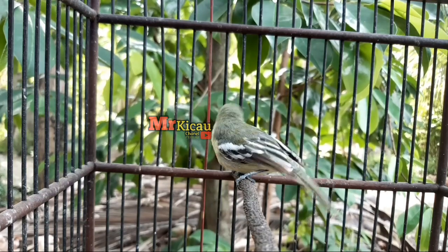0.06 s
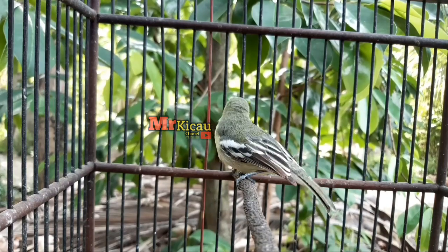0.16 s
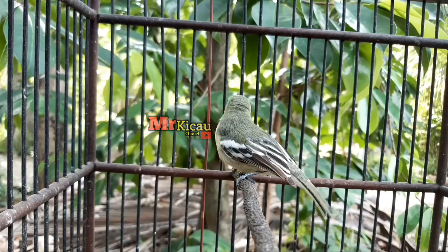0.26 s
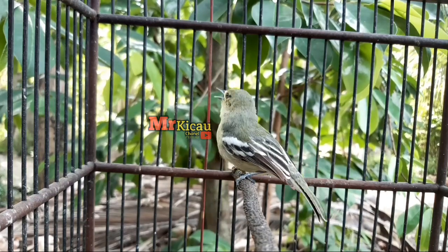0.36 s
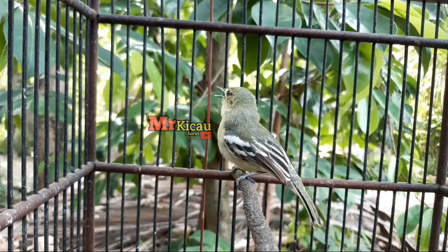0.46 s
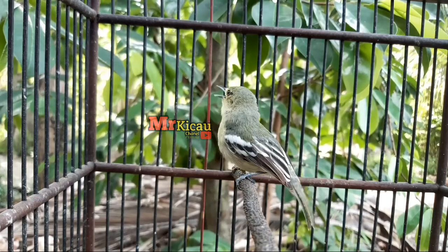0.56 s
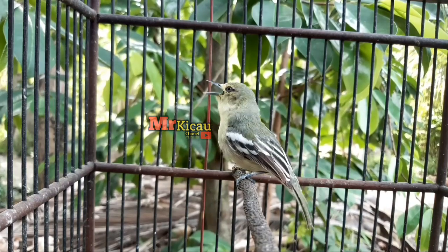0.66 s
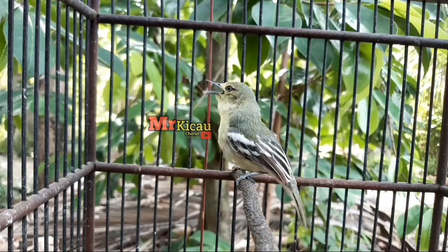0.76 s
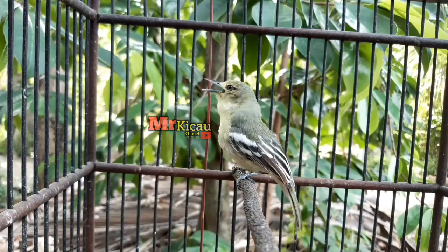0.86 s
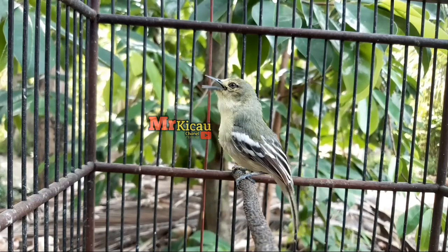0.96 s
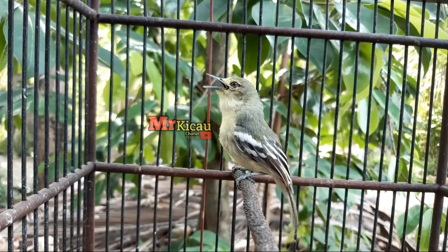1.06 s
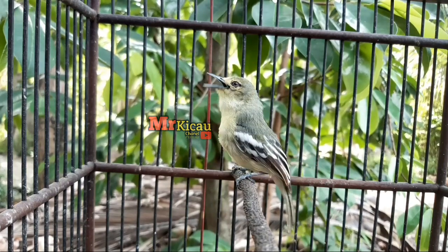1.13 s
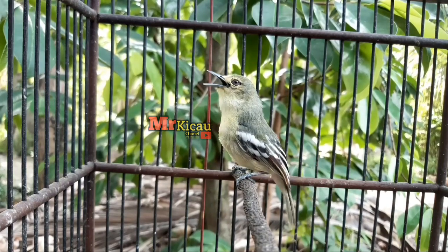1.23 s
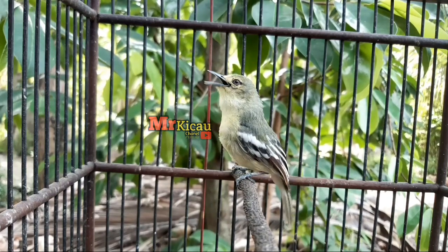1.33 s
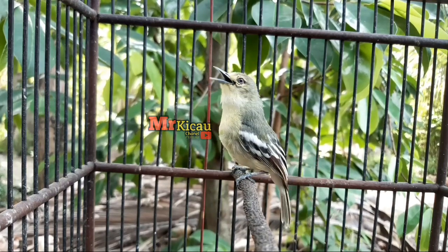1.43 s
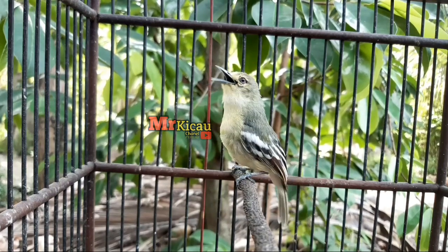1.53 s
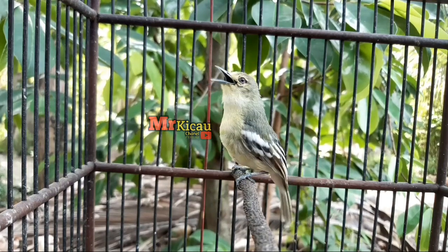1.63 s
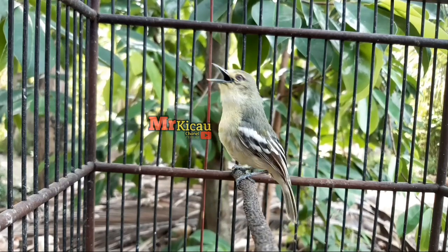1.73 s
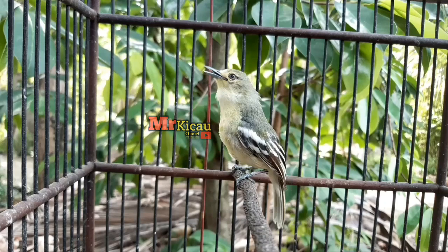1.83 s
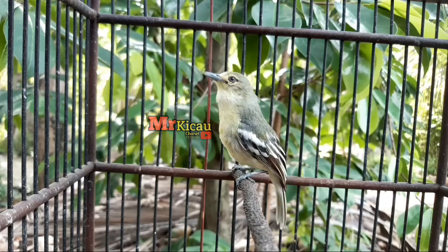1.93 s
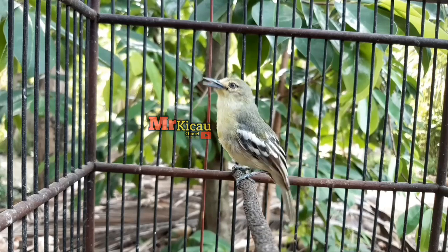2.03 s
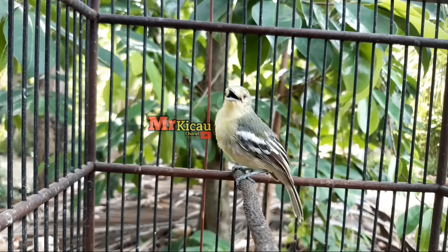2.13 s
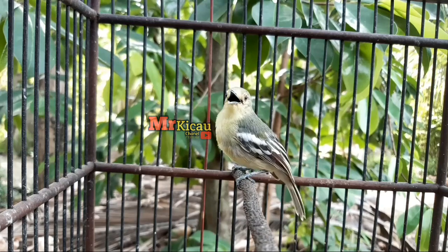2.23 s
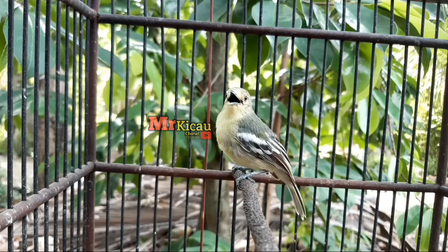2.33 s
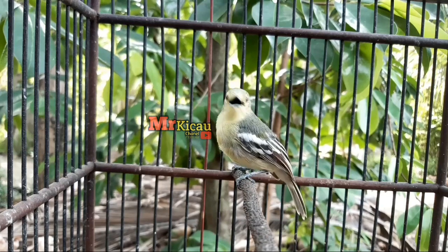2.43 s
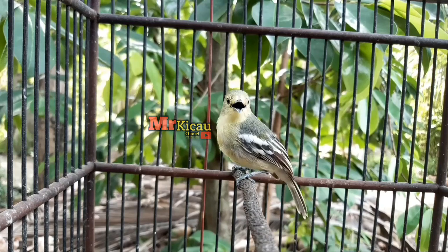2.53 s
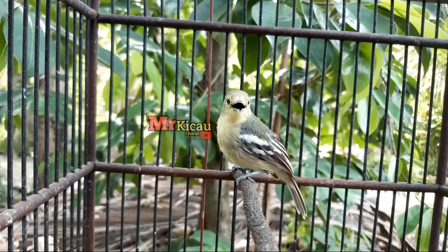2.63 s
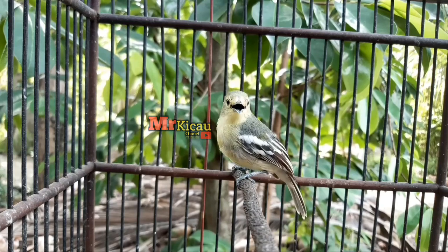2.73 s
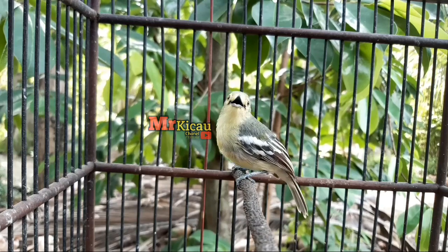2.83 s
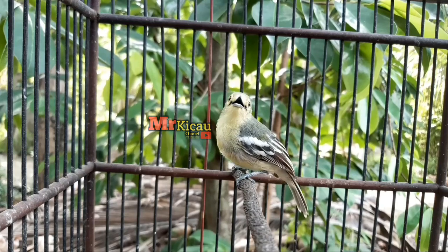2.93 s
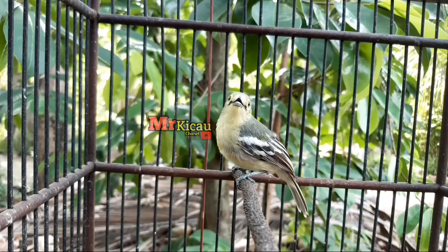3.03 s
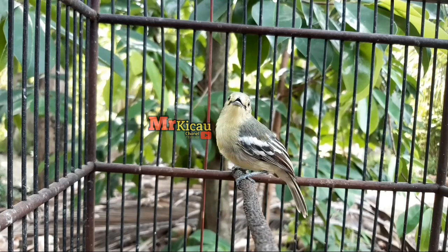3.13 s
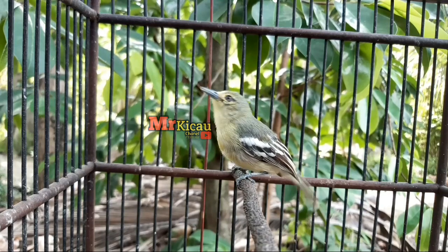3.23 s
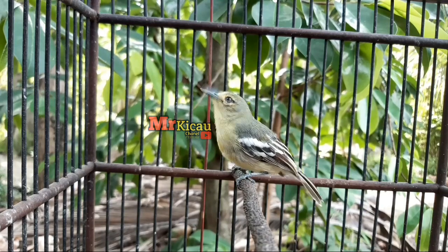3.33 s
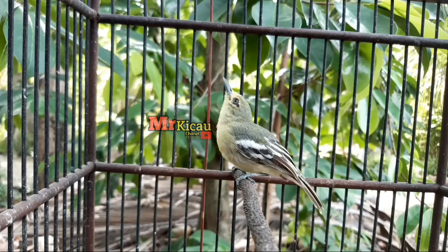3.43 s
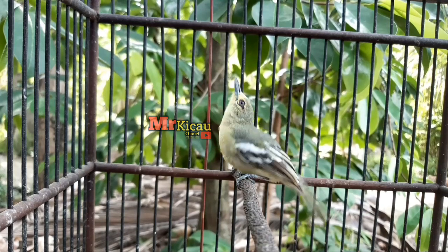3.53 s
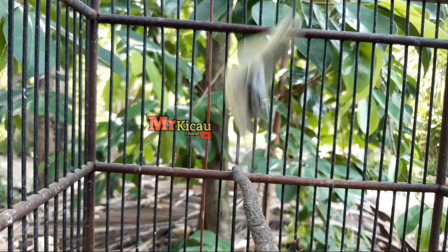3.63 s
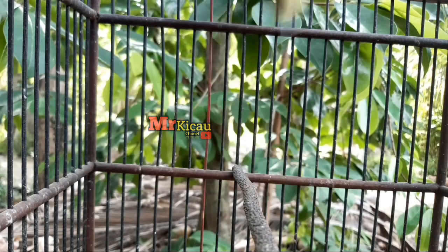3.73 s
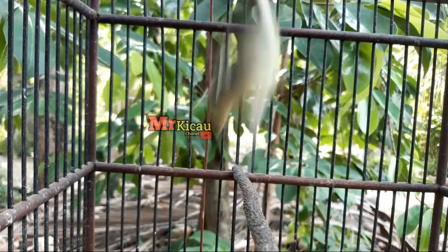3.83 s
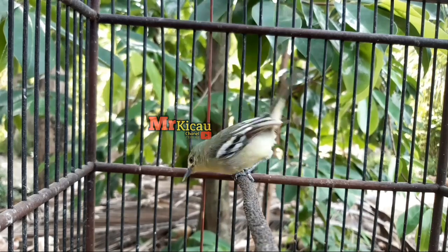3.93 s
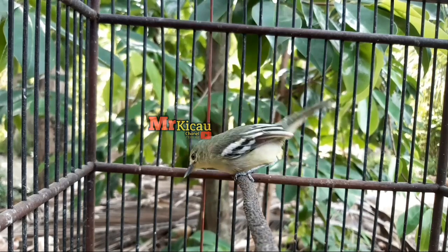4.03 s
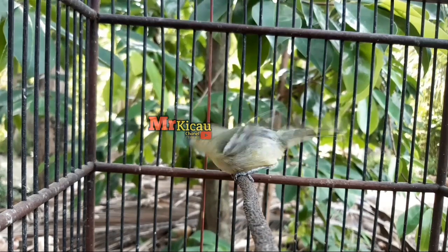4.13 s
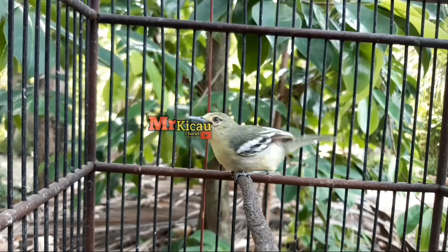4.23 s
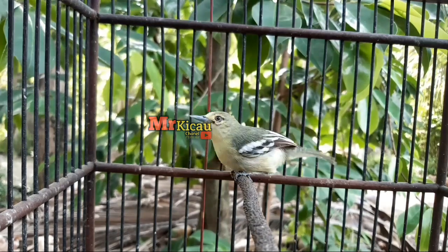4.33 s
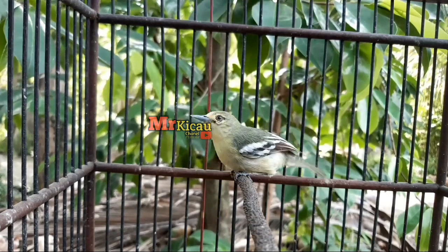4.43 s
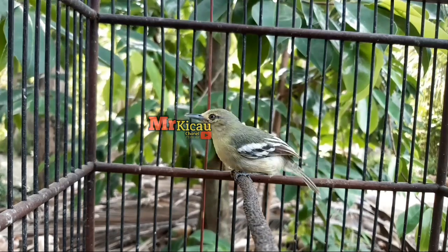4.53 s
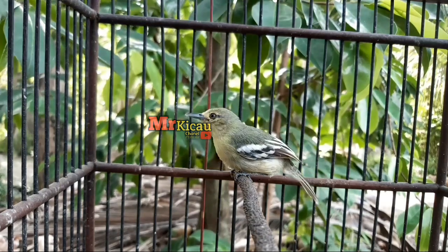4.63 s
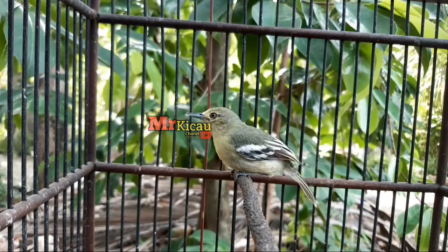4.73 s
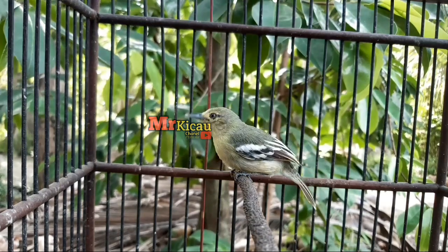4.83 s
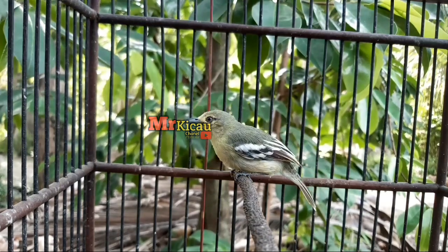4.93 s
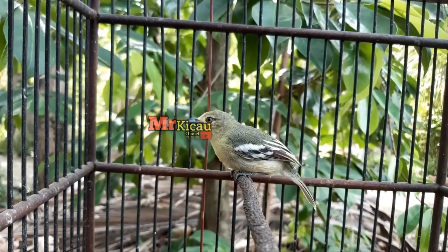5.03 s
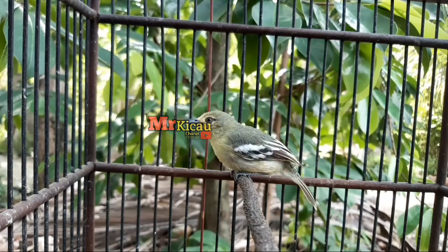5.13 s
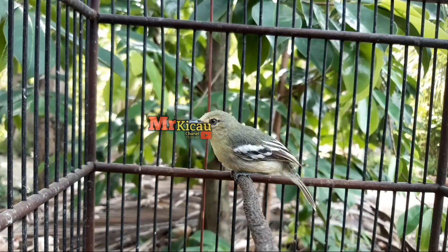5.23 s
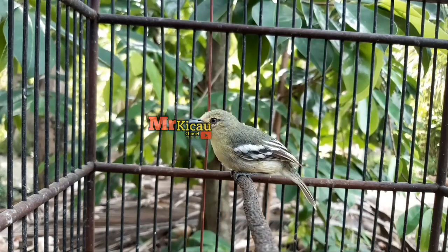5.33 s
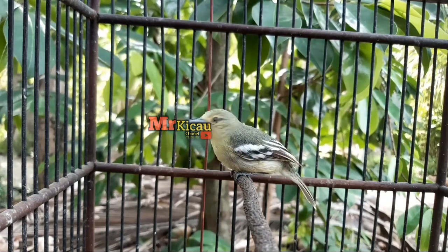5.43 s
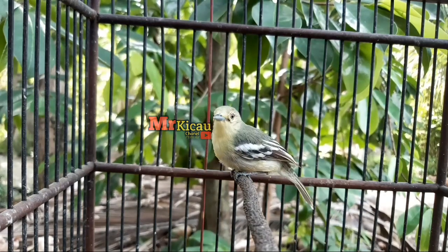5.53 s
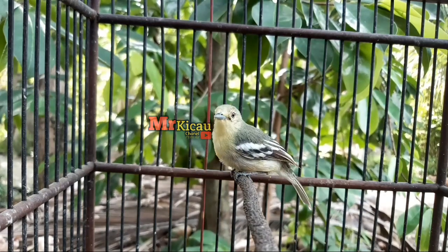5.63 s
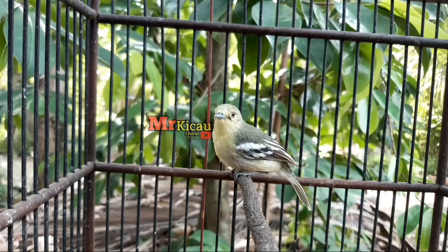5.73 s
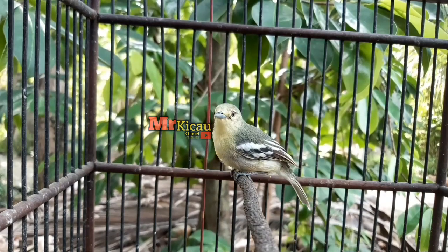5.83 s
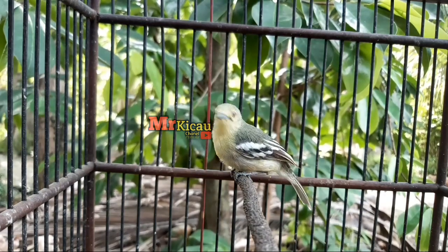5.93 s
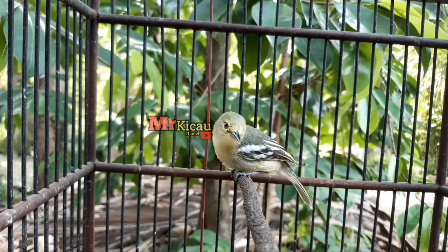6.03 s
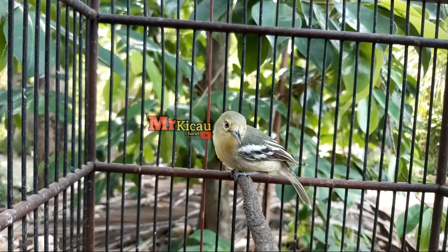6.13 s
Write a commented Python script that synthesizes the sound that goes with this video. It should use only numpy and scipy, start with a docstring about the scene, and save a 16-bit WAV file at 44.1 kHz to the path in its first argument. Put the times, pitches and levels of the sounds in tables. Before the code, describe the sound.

A rapid trill of high, even whistles grows louder and closes with a falling note, sung by a small bird heard close up outdoors. Faint birds answer from the trees over a low rumble. After a few soft rushes of noise, the bird flutters lightly and lands, claws ticking on wire and wood. A far bird sings a slowing, descending run, a distant engine's low chugging rises, and a soft hiss builds last.

```python
"""A caged iora, a small songbird, swells into a fast whistled trill, one push of air for each note,
while other birds call from the trees behind. Near 2 s it ends its song with one long downward slide.
Short rushes and hisses come and go in the yard. Near 4 s the bird flits up and lands on its perch,
and a far bird sings a run of falling notes. A distant one-cylinder engine, idling all along, then
grows louder, each firing thumping its exhaust. A long hiss swells at the end."""
import sys
import numpy as np
from scipy import signal
from scipy.fft import rfft, irfft, next_fast_len
from scipy.io import wavfile
from scipy.ndimage import uniform_filter1d, map_coordinates

SR = 44100
rng = np.random.default_rng(int(sys.argv[2]) if len(sys.argv) > 2 else 0)


def persist_wave(psi):
    """Save psi, clipped to +-1, as 16-bit WAV."""
    counts = np.round(np.clip(psi, -1, 1) * 32767).astype(np.int16)
    wavfile.write(sys.argv[1], SR, np.atleast_2d(counts).T)


N = 272538

# Levels are relative: later gains and filters shift them. A fade_s is the time to die away by 60 dB.
# the trill swells and settles: time_s, pitch_hz, level_db
TRILL_SHAPE = [(0.191, 2612, -33.5), (.25, 2682, -24.5), (.42, 2585, -12), (.6, 2625, -13),
               (.8, 2636, -10.5), (1.32, 2598, -7), (1.74, 2585, -9)]
# the trill's rhythm: start_s, note_count, first_gap_s, gap_shrink_per_note_s
TRILL_RHYTHM = (.1921, 28, .05752, .000046)
# loudness of the closing slide: time_s, level_db
SLIDE_LEVEL = [(1.845, -26.5), (1.862, -11), (1.886, -9), (1.892, -16.5), (1.915, -8.5), (1.955, -11),
               (2.04, -23.5), (2.08, -16), (2.097, -26)]
# tones of the bird's voice box: pitch_multiple, level_db
VOICE_TONES = [(1, 0), (2, -18), (3, -32.5), (4, -35.5), (5, -38.5), (6, -31.5), (7, -39.5), (8, -41),
               (9, -50.5)]
# how the throat and open beak shape the voice: frequency_hz, gain_db
THROAT_SHAPE = [(800, -38), (1200, -11.5), (1450, -11.5), (1800, -1.5), (2650, -1), (3600, -5), (4400, -19),
                (5200, -31.5), (5800, -18), (8000, -16.5), (10500, -28), (13000, 0.5), (15000, -9.5)]
# echoes off nearby surfaces: delay_s, left_db, right_db
WALL_ECHOES = [(.0052, -22.5, -26), (0.0111, -19, -26.5), (0.0233, -25.5, -27.5)]
# wingbeats and feet landing: start_s, rise_s, fade_s, centre_hz, width_hz, level_db
WING_PUFFS = [(3.792, .004, .16, 1100, 447, -46.5), (3.795, 0.0057, 0.15, 376, 251, -55),
              (3.935, 0.02, 1.9, 1177, 1006, -56), (3.94, 0.024, 0.46, 660, 398, -48),
              (3.97, 0.048, 0.92, 228, 89.5, -48), (3.96, 0.029, 3.1, 814, 294, -60)]
# claws ticking on wire and wood: start_s, level_db
CLAW_TICKS = [(3.714, -57.5), (3.791, -46.5), (3.802, -51.5), (3.856, -54), (3.872, -53), (3.933, -52),
              (3.951, -53.5), (3.96, -54), (5.736, -54)]
# how the wire and perch ring: pitch_hz, width_hz, level_db
PERCH_RINGS = [(1070, 160, -6), (3490, 320, -4.5), (6074, 540, -3), (10500, 2700, -7), (14000, 2000, -11.5)]
# birds in the trees: start_s, length_s, first_hz, middle_hz, last_hz, level_db, roughness, echo_db
TREE_CALLS = [(-.07, 0.15, 3350, 3391, 3433, -36, 0.22, -1), (0.193, 0.17, 3923, 3999, 3945, -35, 0.02, -3),
              (0.266, .15, 3427, 3336, 3300, -36.5, 0.17, -2.5),
              (0.411, 0.11, 3350, 2894, 2350, -39, 0.68, -2.5),
              (0.463, .14, 2400, 2190, 2186, -52.5, 0.66, -4),
              (0.647, 0.086, 3914, 3840, 3430, -43, 0.12, -4),
              (0.684, 0.13, 3523, 3147, 2915, -39.5, 0.8, -0.5),
              (0.784, .13, 2500, 2160, 1930, -58.5, 0.35, -6),
              (4.953, 0.109, 3420, 3740, 3730, -59.5, 0.18, -8)]
# a far, low coo: start_s, length_s, first_hz, middle_hz, last_hz, level_db, roughness
FAR_COO = (.28, .52, 488, 495, 490, -62, .06)
# a far bird's run of notes slows down: start_s, note_count, first_gap_s, gap_growth_ratio
RUN_RHYTHM = (3.88, 7, .115, 1.094)
# the engine's speed: time_s, firings_per_s
ENGINE_SPEED = [(0, 19.4), (3, 20.2), (4.2, 20), (4.5, 18.6), (5.2, 18.6), (5.7, 18.85), (6.18, 19.35)]
# the engine's loudness: time_s, level_db
ENGINE_LEVEL = [(0, -61), (1.7, -64.5), (2.1, -59), (3.0, -57.5), (4.2, -57.5), (4.55, -48), (5.8, -43.5),
                (6.18, -43.5)]
# how the exhaust rings: pitch_hz, width_hz, level_db
EXHAUST_RINGS = [(88.3, 34, 0), (119, 43, -0.5), (237, 35, -13), (329, 21, -8)]
# dull rushes and bumps: start_s, rise_s, fade_s, centre_hz, width_hz, level_db
DULL_RUSHES = [(1.55, 0.014, 0.47, 817.4, 394.8, -45.5), (3.268, 0.021, 0.49, 1655, 264, -43),
               (3.27, 0.0172, 0.62, 1950, 331, -48.5), (3.27, 0.033, 0.79, 485, 782, -48),
               (3.27, 0.024, 0.5, 3600, 1105, -52), (6.165, 0.008, .3, 1730, 803, -38)]
# short bright hisses: start_s, rise_s, fade_s, level_db
SHORT_HISSES = [(0.389, 0.032, 1.2, -59.5), (1.549, .014, 0.49, -50.5), (3.27, .012, 0.55, -48.5),
                (3.468, .015, 0.78, -48.5), (3.94, .02, 1, -58), (4.12, 0.0092, .8, -63.5),
                (4.354, .01, 1.17, -64)]
# the long hiss starts suddenly, swells and eases: time_s, level_db
LONG_HISS_LEVEL = [(5.452, -89), (5.462, -53.5), (5.66, -56.5), (5.76, -50), (5.93, -43), (6.18, -49)]
# tone of the hisses: frequency_hz, level_db
HISS_TONE = [(410, -81), (700, -3), (1290, -9), (2660, -5), (3500, -2.5), (4140, -4), (9140, -6),
             (12000, -5), (15600, -8.5)]
# loudness of the outdoor rumble: time_s, level_db
RUMBLE_LEVEL = [(0.0, -58), (0.45, -54), (1.34, -61), (2.98, -65), (3.49, -56.5), (5.28, -56), (5.8, -50.5),
                (6.18, -53)]
# tone of the rumble: frequency_hz, level_db
RUMBLE_TONE = [(15, -59.5), (25, -27.5), (102, 6), (146, -10.5), (213, -9), (266, -17.5), (318, -12.5),
               (366, -20.5), (642, -29.5), (884, -32.5), (1580, -44), (2270, -45), (3000, -53),
               (3900, -89.5), (6600, -120)]
# tone of the thin, steady hiss: frequency_hz, level_db
AIR_TONE = [(1500, -34), (2500, -14), (5300, -16.5), (6000, -8.5), (6550, -1), (7200, -14.5), (7850, -1),
            (8400, -17.5), (12000, -17), (15600, -11.5)]
# how long the trees echo: frequency_hz, fade_s
TREE_FADE = [(300, 0.21), (2500, 0.64), (12000, 0.083)]
# how alike noise is on the left and right: frequency_hz, likeness (1 is identical)
STEREO_LIKENESS = [(100, 0.99), (250, 0.95), (500, 0.51), (1700, 0.24), (4000, 0.41), (8000, 0.053)]


def iora(trill_lead_s=.000097, slide_lead_s=.00012, echo_db=-36):
    """The song reaches the left side first; nearby surfaces and the trees echo it weakly."""
    notes, slide = trill(), closing_slide()
    song = notes + slide
    # the balance shifts as the head turns: time_s, gain_db (added on the right, taken off the left)
    side_db, = curves([(.5, 3.5), (.9, 2), (1.4, .5), (1.75, .9), (1.9, .5)])
    direct = (lead_left(notes, trill_lead_s) + lead_left(slide, slide_lead_s)) * amp([-side_db, side_db])
    walls = filtered(song, lambda f: sum(amp([[left], [right]]) * np.exp(-2j * np.pi * f * delay)
                                         for delay, left, right in WALL_ECHOES))
    return direct + walls + amp(echo_db) * tree_echo(song)


def trill(attack_s=.023, release_s=.0168, arch_hz=52, scatter_hz=7, scatter_db=.42, even_hiss_db=-50):
    """Each note is one push of air; more effort makes it fuller and brighter, and its pitch sags more."""
    t = clock()
    first, count, gap, shrink = TRILL_RHYTHM
    starts = first + np.r_[0, np.cumsum(gap - shrink * np.arange(count - 1))]
    note = np.maximum(np.searchsorted(starts, t) - 1, 0)
    chance = rng.standard_normal((count, 2))[note]
    times, hz, db = np.transpose(TRILL_SHAPE)
    note_hz = np.interp(starts[note], times, hz) + scatter_hz * chance[:, 0]
    note_db = np.interp(starts[note], times, db) + scatter_db * chance[:, 1]
    age = (t - starts[note]) / (1 - .006 * (db.max() - note_db))  # softer notes are shorter
    effort = np.interp(t, [.85, 1.15], [0, 1])
    rise = np.clip(age / attack_s, 0, 1)
    release = np.cos(np.pi / 2 * np.clip((age - attack_s) / release_s, 0, 1)) ** 2
    fullness = .25 + .75 * effort  # 0 is a straight rise, 1 a rounded one
    push = ((1 - fullness) * rise + fullness * np.sin(np.pi / 2 * rise)) * release
    pressure = uniform_filter1d(push * amp(note_db), size=40) * amp(.3 * wobble(140))
    half = (attack_s + release_s) / 2
    off_centre = np.clip(age - half, -half, half)
    sag = np.interp(effort, [0, 1], [400, 2250])
    pitch = note_hz - arch_hz * (off_centre / half) ** 2 - sag * off_centre
    # a faint, even hiss follows the trill's loudness
    even_hiss = amp(even_hiss_db) * uniform_filter1d(pressure, size=3000) * rng.standard_normal(N)
    return voice_box(pitch, pressure, bright_db=-7 + 9 * effort, hiss_db=-47.5) + even_hiss


def closing_slide(start_hz=2475, fall_hz_per_s=5700, steepen_hz_per_s2=4400, quaver=.003):
    """The pitch falls ever faster; once it is below the throat's ring, the octave above takes over."""
    t = clock()
    start, end = SLIDE_LEVEL[0][0], SLIDE_LEVEL[-1][0]
    age = np.clip(t, start, end) - start
    pitch = (start_hz - fall_hz_per_s * age - steepen_hz_per_s2 * age ** 2) * (1 + quaver * wobble(600))
    db, = curves(SLIDE_LEVEL)
    sounding = (t > start) & (t < end)
    pressure = amp(db) * uniform_filter1d(sounding * 1., size=60)
    return voice_box(pitch, pressure, bright_db=np.interp(t, [start, end], [8.5, 1]), hiss_db=-45.5)


def voice_box(pitch, pressure, bright_db, hiss_db, jitter=.0026):
    """A nearly pure whistle and its overtones, shaped by the throat."""
    phase = 2 * np.pi * np.cumsum(pitch * (1 + jitter * wobble(430))) / SR
    voice = np.zeros(N)
    for k, db in VOICE_TONES:
        overtone_db = (bright_db * min(k - 1, 4) / 4 + 3 * wobble(90)) * (k > 1)
        gain = amp(db + overtone_db + along(THROAT_SHAPE, k * pitch))
        voice += gain * np.sin(k * phase) * (k * pitch < SR / 2)
    # a faint hiss rises and falls with each note: frequency_hz, level_db
    hiss_tone = [(1000, -2.5), (3000, 12), (5000, 4), (7000, -6), (10000, -12.5), (13500, -9)]
    hiss = unit(filtered(rng.standard_normal(N), lambda f: amp(along(hiss_tone, f))))
    return pressure * (voice + amp(hiss_db + 2 * wobble(28)) * hiss)


def flitting(echo_db=-15):
    """Wings push the air, and claws tick as the bird leaves the perch and grips it again."""
    taps = sum(amp(db) * burst(start, rise_s=.003, fade_s=.045) for start, db in CLAW_TICKS)
    ticks = taps * noise(lambda f: ringing(PERCH_RINGS, f))
    return puffs(WING_PUFFS) + ticks + amp(echo_db) * tree_echo(ticks[0])


def far_birds(run_echo_db=-8, coo_echo_db=-4):
    """Other birds call, half lost in the echo of the trees."""
    calls = [(whistle(*call), echo_db) for *call, echo_db in TREE_CALLS]
    calls += [(falling_run(), run_echo_db), (whistle(*FAR_COO), coo_echo_db)]
    echo = tree_echo(sum(amp(echo_db) * call for call, echo_db in calls))
    return sum(call for call, _ in calls) + echo


def falling_run(pitch_hz=(2790, 2180), length_s=(.072, .115), slide_hz=(160, 538), level_db=(-57, -61.5)):
    """Falling notes, each lower, longer and softer; the pairs give the first and last note."""
    start, count, gap, slowing = RUN_RHYTHM
    run = np.zeros(N)
    for progress in np.linspace(0, 1, count):
        hz = np.interp(progress ** 1.9, [0, 1], pitch_hz)
        length, slide, db = (np.interp(progress, [0, 1], ends) for ends in (length_s, slide_hz, level_db))
        run += whistle(start, length, hz + slide / 2, hz - slide / 10, hz - slide / 2, db, roughness=.27)
        start, gap = start + gap, gap * slowing
    return run


def whistle(start_s, length_s, first_hz, middle_hz, last_hz, db, roughness):
    """A gliding call with weak overtones; a fast shake in pitch makes it harsh."""
    progress = (clock() - start_s) / length_s
    sounding = (progress > 0) & (progress < 1)
    progress = progress[sounding]
    glide = np.polyval(np.polyfit([0, .5, 1], [first_hz, middle_hz, last_hz], 2), progress)
    pitch = glide * (1 + .1 * roughness * wobble(500, size=len(progress)))
    phase = 2 * np.pi * np.cumsum(pitch) / SR
    tone = np.sin(phase) + amp(-26) * np.sin(2 * phase) + amp(-37) * np.sin(3 * phase)
    call = np.zeros(N)
    call[sounding] = amp(db) * np.sin(np.pi * progress) ** .62 * tone
    return call


def engine(gain_db=-4, echo_db=-20, drift=.004, scatter_db=1.3, muffle_hz=520):
    """Each slightly uneven firing is one thump that rings the exhaust."""
    rate, = curves(ENGINE_SPEED)
    db, = curves(ENGINE_LEVEL)
    cycles = np.cumsum(rate * (1 + drift * wobble(5.6))) / SR
    fired = np.flatnonzero(np.diff(np.floor(cycles)))
    kicks = np.zeros(N)
    kicks[fired] = amp(scatter_db * rng.standard_normal(len(fired)))
    thumps = unit(filtered(kicks, lambda f: ringing(EXHAUST_RINGS, f) / (1 + (f / muffle_hz) ** 4)))
    return amp(db + gain_db) * (thumps + amp(echo_db) * tree_echo(thumps))


def puffs(rows):
    """Short, ragged swells of noise, each gathered around one frequency."""
    flutter = amp(2 * wobble(110))
    return flutter * sum(amp(db) * burst(start, rise, fade) * noise(lambda f: resonance(f, hz, width) ** 2)
                         for start, rise, fade, hz, width, db in rows)


def hisses(right_lead_s=.00045):
    """Bright, grainy hisses from the right: several short ones, then a long one."""
    long_db, = curves(LONG_HISS_LEVEL)
    level = sum(amp(db) * burst(start, rise, fade) for start, rise, fade, db in SHORT_HISSES)
    level += amp(long_db) * (clock() > LONG_HISS_LEVEL[0][0])
    hiss = level * amp(1.2 * wobble(400)) * noise(lambda f: amp(along(HISS_TONE, f)))
    return lead_left(hiss, -right_lead_s)


def yard(rumble_gain_db=5, air_db=-72):
    """Low outdoor rumble under a thin, steady high hiss."""
    db, = curves(RUMBLE_LEVEL)
    level = amp(db + rumble_gain_db + .88 * wobble(16))
    rumble = level * noise(lambda f: amp(along(RUMBLE_TONE, f)) * f / (f + 200))
    return rumble + amp(air_db) * noise(lambda f: amp(along(AIR_TONE, f)))


def tree_echo(x):
    """Leaves scatter a sound into a soft stereo echo."""
    hz, t, spectrum = signal.stft(rng.standard_normal((2, SR // 2)), SR, nperseg=256)
    fade = amp(-60 * t / along(TREE_FADE, hz)[:, None])
    _, tail = signal.istft(spectrum * fade, SR, nperseg=256)
    return signal.fftconvolve(x[None], tail / np.linalg.norm(tail[0]), axes=1)[:, :N]


def noise(tone):
    """Stereo noise with the given tone, alike on both sides in the bass and less so in the treble."""
    def response(f):
        angle = np.arccos(np.clip(along(STEREO_LIKENESS, f), -1, 1)) / 2
        return tone(f) * np.array([np.cos(angle), np.sin(angle)])
    mid, side = filtered(rng.standard_normal((2, N)), response)
    return unit(np.array([mid + side, mid - side]))


def burst(start_s, rise_s, fade_s):
    """A level that rises and then dies away."""
    age = np.maximum(clock() - start_s, 0)
    return np.minimum(age / rise_s, 1) * amp(-60 * np.maximum(age - rise_s, 0) / fade_s)


def ringing(rows, f):
    """How a body that rings at several pitches responds to frequency f."""
    return sum((-1) ** k * amp(db) * resonance(f, hz, width) for k, (hz, width, db) in enumerate(rows))


def resonance(f, hz, width):
    """How a body that rings at one pitch responds to frequency f."""
    return 1j * f * width / (hz * hz - f * f + 1j * f * width)


def lead_left(x, lead_s):
    """Make the left side arrive earlier than the right (later if negative)."""
    return filtered(x, lambda f: np.exp(1j * np.pi * f * lead_s * np.array([[1], [-1]])))


def filtered(x, response):
    """Scale and delay each frequency in x as response(f) says."""
    size = next_fast_len(N + SR // 2)
    return irfft(rfft(x, size) * response(np.fft.rfftfreq(size, 1 / SR)), size)[..., :N]


def wobble(rate, size=N):
    """A smooth curve through `rate` random points a second."""
    points = rng.standard_normal(int(size * rate / SR) + 4)
    return map_coordinates(points, [np.arange(size) * rate / SR])


def curves(rows):
    """One value per sample for each column after the time."""
    times, *columns = np.transpose(rows)
    return [np.interp(clock(), times, column) for column in columns]


def along(points, hz):
    """Look up a frequency in a table, on a log scale."""
    frequencies, values = np.transpose(points)
    return np.interp(np.log(hz + 1), np.log(frequencies + 1), values)


def clock():
    """The time of each sample."""
    return np.arange(N) / SR


def unit(x):
    """Scale to an average power of 1."""
    return x / np.sqrt(np.mean(x ** 2) + 1e-20)


def amp(db):
    """Decibels to gain."""
    return 10 ** (np.asarray(db) / 20)


def scene():
    """The near bird's song in front of everything else, which lies a little to the right."""
    around = far_birds() + engine() + puffs(DULL_RUSHES) + flitting() + hisses() + yard()
    return iora() + around * amp([[-.9], [.9]])


def record(dry, top_hz=15750):
    """Cut off the very highest treble."""
    return filtered(dry, lambda f: f < top_hz)


dry = scene()
out = record(dry)
persist_wave(out)
```